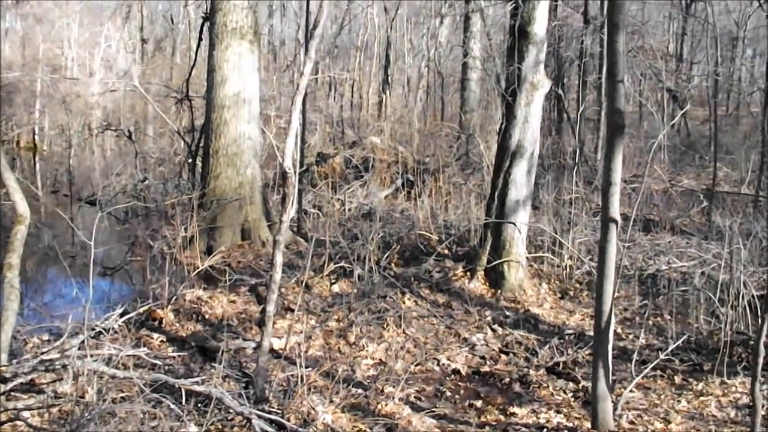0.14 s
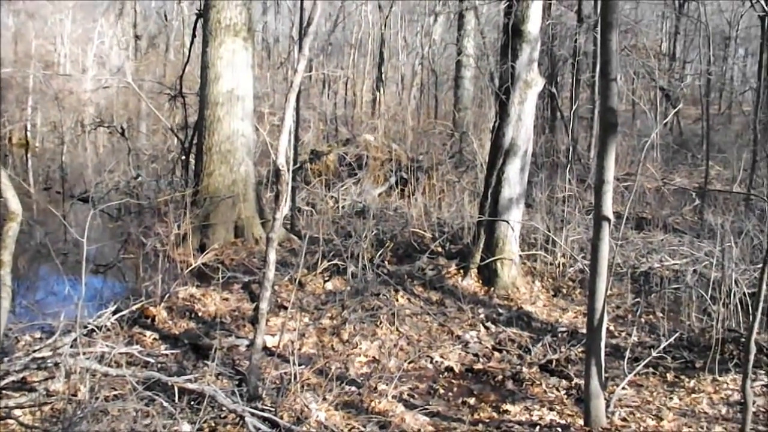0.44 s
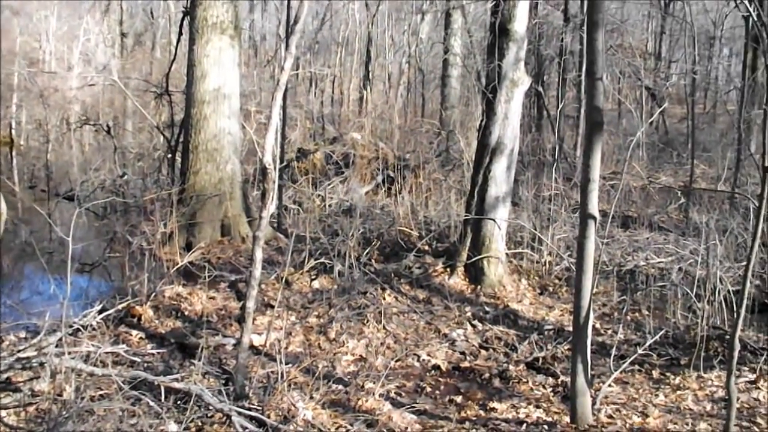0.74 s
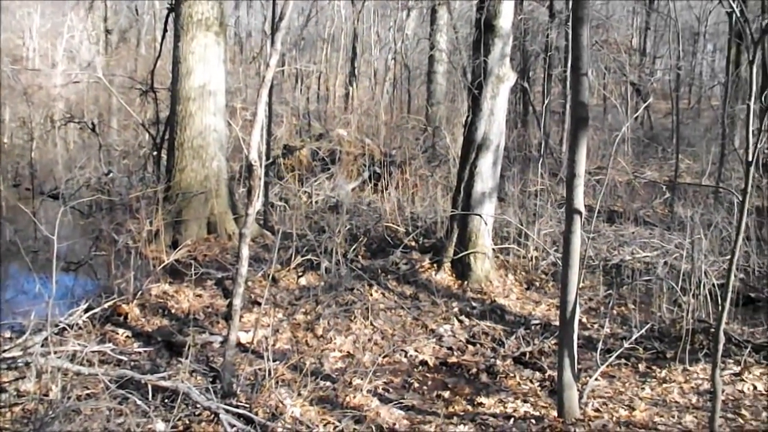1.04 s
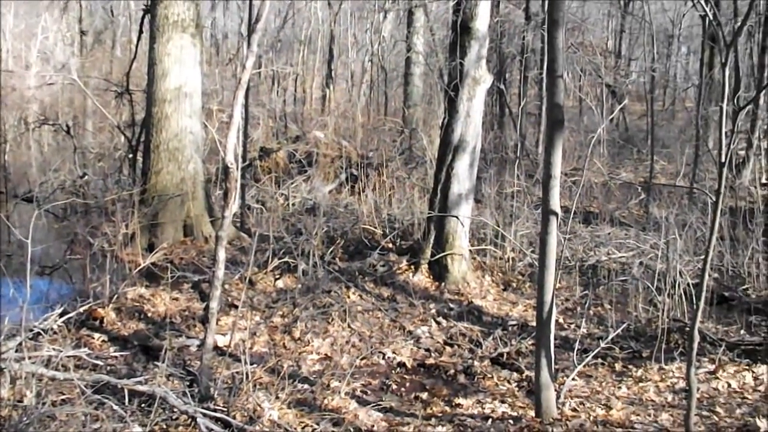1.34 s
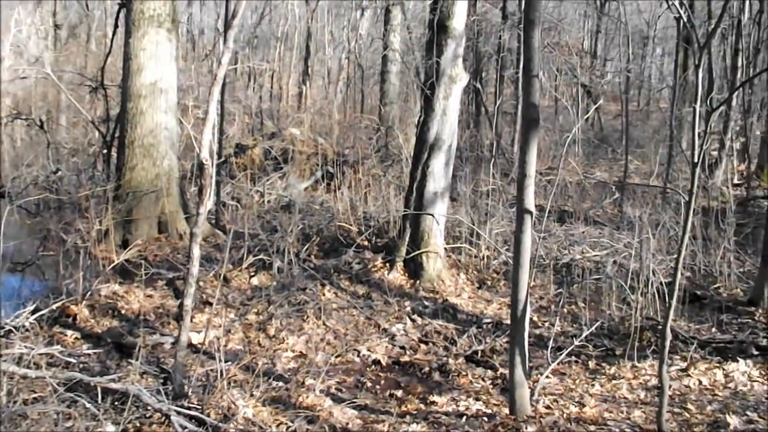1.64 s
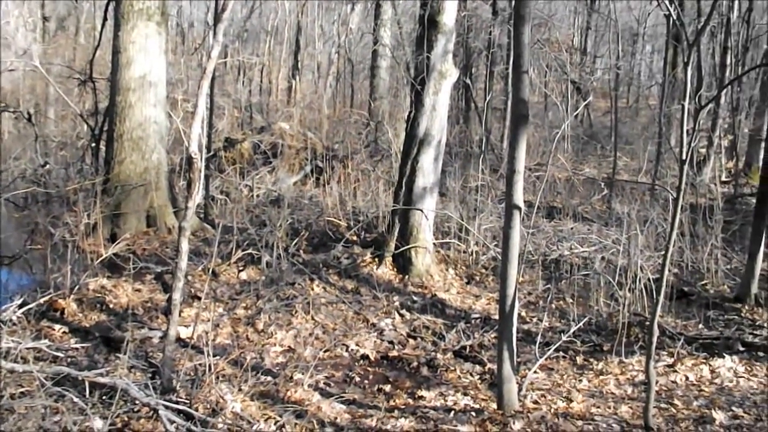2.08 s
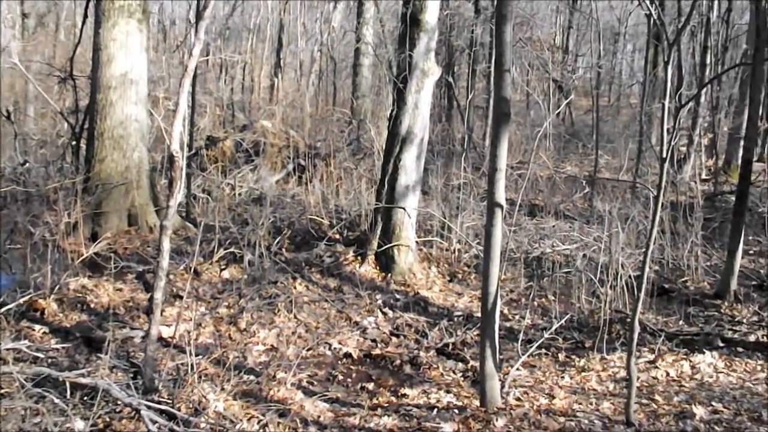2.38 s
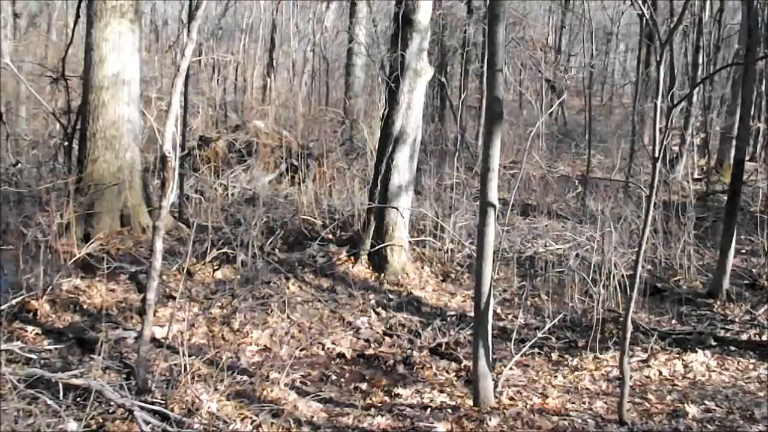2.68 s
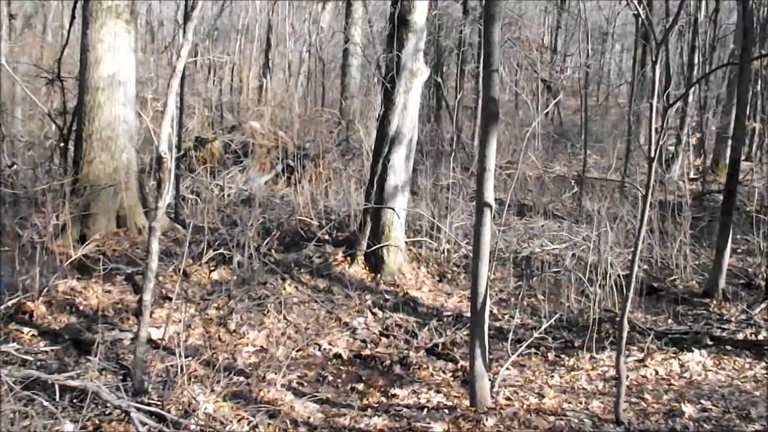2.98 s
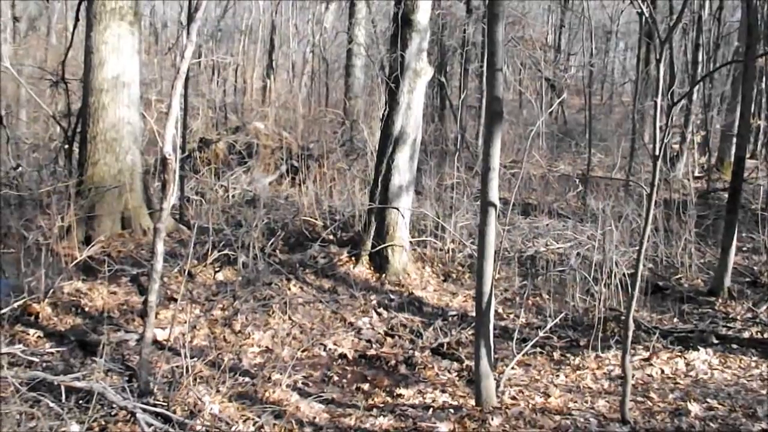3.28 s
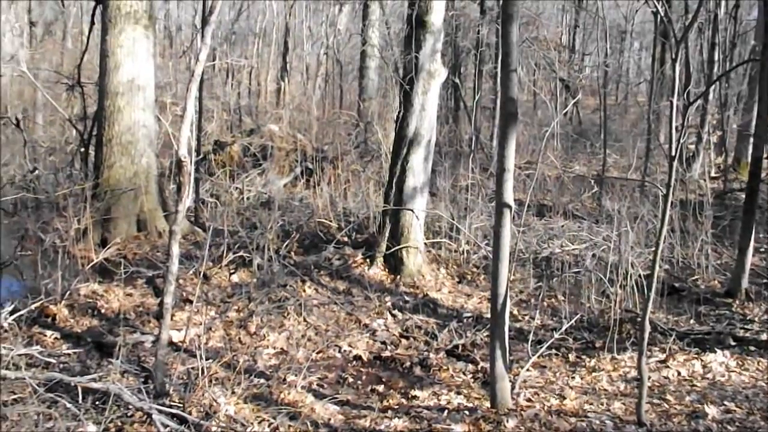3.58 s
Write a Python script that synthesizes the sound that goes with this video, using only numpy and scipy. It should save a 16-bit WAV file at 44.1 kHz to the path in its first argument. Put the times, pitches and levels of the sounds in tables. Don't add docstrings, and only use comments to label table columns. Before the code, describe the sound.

Small tree frogs peep in a dense, shrill chorus around a woodland pool, with occasional clucks and clicks.

```python
import sys
import numpy as np
from scipy import signal
from scipy.fft import rfft, irfft
from scipy.io import wavfile
from scipy.ndimage import uniform_filter1d

SR = 44100
rng = np.random.default_rng(int(sys.argv[2]) if len(sys.argv) > 2 else 0)


def generate_wav(signal):
    frames = np.transpose(np.atleast_2d(signal))
    scaled = np.clip(frames, -1, 1) * 32767
    pcm = np.round(scaled).astype(np.int16)
    wavfile.write(sys.argv[1], SR, pcm)


def linear_from_db(decibels):
    return 10 ** (np.asarray(decibels, float) / 20)


N = 164052


def evened(x):
    return x / np.sqrt(np.mean(x ** 2) + 1e-20)


def read(points, hz):
    f, value = np.transpose(points)
    return np.interp(np.log(hz + 1), np.log(f + 1), value)


def add(mix, s, sound):
    at = round(s * SR)
    part = mix[max(at, 0):][:max(len(sound) + min(at, 0), 0)]
    part += sound[max(-at, 0):][:len(part)]


def ring(x, hz, width_hz):
    r = np.exp(-np.pi * width_hz / SR)
    pole = r * np.exp(2j * np.pi * hz / SR)
    return 2 * signal.lfilter([1 - r], [1, -pole], x + 0j).real


def air():
    # frequency in Hz, level in dB per Hz
    air_colour = [(25, 4), (130, -9), (155, -17.5), (800, -31), (2600, -29), (5000, -43.5), (9000, -50.5),
                  (15000, -52.5)]
    # time in seconds, level in dB
    gusts = [
        (0, -44.5),
        (0.42, -34.5),
        (0.56, -41),
        (1.4, -42),
        (2.03, -41),
        (2.075, -29),
        (2.14, -39),
        (3.0, -44),
        (3.72, -44.5),
    ]
    patch_db, flicker_db = 0.78, 1.4
    frames = N // 256 + 5
    a, b, patches = rng.standard_normal((frames, 513, 3)).T
    patches = uniform_filter1d(patches, size=12, axis=0)
    patches = evened(uniform_filter1d(patches, size=10, axis=1))
    flicker = rng.standard_normal(frames)
    grid = (a + 1j * b) * linear_from_db(patch_db * patches + flicker_db * flicker)
    hiss = signal.istft(grid, nperseg=1024, noverlap=768)[1][:N]

    hz = np.fft.rfftfreq(N, 1 / SR)
    shaped = rfft(evened(hiss)) * linear_from_db(read(air_colour, hz)) * (hz > 12)
    low = 1 / (1 + (hz / 55) ** 8)
    gust_db = np.interp(np.arange(N) / SR, *np.transpose(gusts))
    rumble = irfft(shaped * low, N) * linear_from_db(gust_db - gust_db.mean())
    return linear_from_db(-33) * evened(rumble + irfft(shaped * (1 - low), N))


def rustle():
    # start in seconds, length in seconds, centre in Hz, width in Hz, level in dB
    rustles = [
        (2.9, .06, 7400, 1900, -62),
        (2.26, 0.13, 2600, 500, -46.5),
        (2.7, 0.29, 2650, 400, -50.5),
        (3.17, 0.08, 2300, 640, -48),
        (1.7, .4, 370, 560, -54.5),
        (3.3, 0.078, 1500, 900, -52.5),
        (.8, .08, 800, 500, -56),
    ]
    out = np.zeros(N)
    for s, length, hz, width_hz, db in rustles:
        size = round(length * SR)
        grains = rng.standard_normal(SR) * (rng.random(SR) < .03)
        grains = grains[:size] * np.hanning(size)
        add(out, s, linear_from_db(db) * evened(ring(ring(grains, hz, width_hz), hz, width_hz)))
    return out


def knocks():
    # start in seconds, peak in dB
    knock_times = [(0.056, -32), (0.163, -33.5), (0.252, -32), (0.365, -33), (2.051, -34.5), (2.329, -38),
                   (2.83, -32.5), (2.943, -31.5), (3.032, -31.5), (3.149, -33.5), (3.583, -34),
                   (3.678, -30.5)]
    # frequency in Hz, level in dB
    knock_colour = [(100, 0), (250, -1), (600, -8), (1300, -9), (2200, -11), (5000, -57)]
    peak_s = .006
    out, t = np.zeros(N), np.arange(2048) / SR
    colour = linear_from_db(read(knock_colour, np.fft.rfftfreq(2048, 1 / SR)))
    swell = t / peak_s * np.exp(1 - t / peak_s)
    for s, db in knock_times:
        puff = evened(irfft(rfft(rng.standard_normal(2048)) * colour))
        add(out, s, linear_from_db(db - 2.5) * puff * swell)
    return out


def twigs():
    # start in seconds, peak in dB, ring in Hz, ring width in Hz
    ticks = [(1.088, -42, 4860, 1215), (1.914, -46, 6200, 876), (2.076, -39.5, 5450, 2500),
             (2.3238, -23.5, 2510, 500), (2.326, -49.5, 7500, 3000), (2.4519, -42.5, 6800, 1210),
             (2.4516, -36.5, 4600, 910), (3.304, -47, 7600, 2960), (3.327, -45, 7500, 2540),
             (3.328, -43.5, 5300, 900), (1.982, -42.5, 3930, 394), (2.111, -38.5, 3990, 394)]
    out, t = np.zeros(N), np.arange(2048) / SR
    for s, db, hz, width_hz in ticks:
        burst = rng.standard_normal(2048) * np.exp(-t / 0.0021)
        tick = ring(ring(burst, hz, width_hz), hz, width_hz)
        add(out, s, linear_from_db(db) * tick / abs(tick).max())
    return out


def pops():
    # start in seconds, peak in dB, top in Hz
    snaps = [
        (.592, -20.5, 4600),
        (1.798, -23, 1900),
        (3.189, -22, 2700),
        (3.2152, -21, 2200),
        (2.3262, -31, 2600),
        (3.386, -30, 1900),
    ]
    out = np.zeros(N)
    for s, db, top_hz in snaps:
        band = signal.butter(N=3, Wn=[400, top_hz], btype='band', fs=SR, output='sos')
        snap = signal.sosfilt(band, np.arange(400) == 0)
        add(out, s, linear_from_db(db) * snap / abs(snap).max())
    return out


def cluckers():
    # start in seconds, peak in dB, throat resonance in Hz, span of the pulses in seconds
    clucks = [(0.1925, -25.5, 1650, 0.015), (0.4462, -31.5, 1450, 0.0072), (0.823, -32, 1540, 0.027),
              (1.4508, -47, 1573, 0.012), (1.631, -28.5, 1580, 0.014), (1.7945, -20.5, 1540, 0.0099),
              (1.9134, -34.5, 1550, 0.021), (2.0255, -30, 1630, 0.021), (2.4745, -36.5, 1504, 0.01),
              (2.788, -33, 1456, 0.0099), (3.193, -26.5, 1426, 0.013), (3.22, -31.5, 1445, 0.012),
              (3.3862, -32.5, 1660, 0.012), (3.5579, -29.5, 1550, 0.018), (2.338, -37, 1470, .008)]
    pulses_per_s, throat_width_hz, low_db = 150, 120, -12
    out, t = np.zeros(N), np.arange(2600) / SR
    soften = signal.butter(N=4, Wn=2620, fs=SR, output='sos')
    for s, db, hz, span in clucks:
        pulses = np.diff(np.floor(t * pulses_per_s + .8), prepend=0)
        folds = pulses + .16 * rng.standard_normal(len(t))
        drive = signal.sosfilt(soften, folds * np.exp(-t / span))
        voice = ring(drive, hz, throat_width_hz) + linear_from_db(low_db) * ring(drive, hz * 0.76, 360)
        add(out, s, linear_from_db(db + 1.5) * voice / abs(voice).max())

    murmur_hz, murmur_width_hz, murmur_per_s = 1650, 130, 1300
    far = (rng.random(N) < murmur_per_s / SR) * rng.standard_normal(N)
    murmur = ring(ring(far, murmur_hz, murmur_width_hz * 2), murmur_hz, murmur_width_hz)
    return out + linear_from_db(-49.5) * evened(murmur)


def halo():
    flicker = evened(uniform_filter1d(rng.standard_normal(N), size=200))
    grains = rng.standard_normal(N) * linear_from_db(1.5 * flicker)
    band = signal.butter(N=4, Wn=[2500, 4260], btype='band', fs=SR, output='sos')
    return linear_from_db(-41) * evened(signal.sosfilt(band, ring(grains, 3470, 840)))


def peep(length, first_hz, rise_hz, db, drift):
    bend, wobble_hz, tire_db, flutter_db = 1.3975, 7.96, -5, 3.6
    rise_s, fall_s = .012, .018
    t = np.arange(0, length, 1 / SR)
    wander = np.array([np.interp(t / length, np.linspace(0, 1, len(d)), d) for d in drift])
    slide = rise_hz * (1 - (1 - t / length) ** bend)
    turns = np.cumsum(first_hz + slide + wobble_hz * wander[0]) / SR
    edge = np.clip(np.minimum(t / rise_s, (length - t) / fall_s), 0, 1)
    shape = np.sin(np.pi / 2 * edge)
    level = linear_from_db(db + tire_db * t / length + flutter_db * wander[1])
    return np.sqrt(2) * level * shape * np.sin(2 * np.pi * turns)


def far_chorus():
    per_s, low_hz, span_hz, rise_hz = 170, 2783, 389.7, 230
    out = np.zeros(N)
    for k in range(round(per_s * 4)):
        when, pitch, long, rise, loud = rng.random(5)
        start = (k + when) / per_s - .2
        length = 0.094 + 0.0607 * long
        first_hz = low_hz + span_hz * (pitch + loud) / 2 * 1.2
        drift = rng.standard_normal((2, 12))
        add(out, start, peep(length, first_hz, rise_hz * (.6 + .8 * rise), -6 * loud, drift))
    return linear_from_db(-21) * evened(out)


def callers():
    # start in seconds, length in
    # seconds, first pitch in Hz, rise in Hz, level in dB
    pool_calls = [(0.167, .11, 2960, 248.7, -11.5), (.335, .105, 3094, 407, -14),
                  (.545, .09, 3126, 215, -11.5), (.657, .115, 3066, 343, -13), (0.776, .095, 3129, 263, -9),
                  (0.911, .108, 3070, 451, -15), (1.402, 0.1, 3123, 240.5, -20.5),
                  (1.496, .105, 3118, 258, -17), (1.57, .125, 3099, 295.6, -11.5),
                  (1.714, .118, 3019, 497, -13.5), (1.838, .095, 3133, 258, -16),
                  (2.135, .1, 3150, 240, -21), (2.231, .1, 3078, 289.6, -15.5),
                  (2.458, .115, 3064, 469.5, -12), (2.579, .085, 3193, 238.6, -16.5),
                  (2.767, .065, 3150, 222, -19.5), (2.864, .085, 3070, 298.5, -11),
                  (2.934, .07, 3346, 200, -19), (3.259, 0.066, 2967, 296, -14.5),
                  (3.28, .115, 3168, 250, -14.5), (3.532, .112, 3068, 329.5, -15),
                  (2.499, .075, 3186, 200, -18.5), (3.311, .07, 3140, 180, -17.5),
                  (.03, 0.073, 3100, 110, -17.5), (0.088, .05, 3270, 60, -14.5),
                 (.42, .06, 3050, 200, -14.5), (.475, 0.07, 2980, 170, -16), (1.0625, .05, 2995, 70, -13.5),
                 (1.138, 0.04, 3160, 60, -22), (1.215, .04, 3020, 100, -21.5),
                 (1.26, 0.081, 3180, 100, -18.5), (1.503, .06, 3020, 110, -11.5),
                 (1.8, 0.098, 3010, 120, -23), (1.99, .06, 3150, 60, -18.5), (2.289, .05, 3090, 80, -21),
                 (2.409, 0.054, 2900, 150, -21.5), (2.523, .09, 2970, 150, -20.5),
                 (2.853, .05, 2980, 100, -11.5), (3.6, .08, 3060, 190, -18.5),
                 (3.631, 0.067, 2965, 80, -18.5), (0.769, 0.056, 2930, 120, -18),
                 (2.93, 0.036, 2980, 60, -13.5), (.06, 0.051, 2900, 170, -21), (.001, .05, 3180, 120, -21),
                 (0.063, 0.087, 3050, 180, -20), (.715, .04, 3100, 100, -18.5), (2.3, .06, 2800, 140, -23),
                 (1.74, 0.031, 3210, 120, -22), (1.2484, .07, 3146, 130, -21),
                 (2.625, 0.065, 3116, 90, -18), (2.7, .05, 2970, 60, -19.5), (.96, .09, 2983, 90, -19),
                 (2.03, .1, 2750, 170, -23), (1.658, 0.047, 3150, 120, -20), (3.562, .08, 2890, 140, -21.5)]
    deep_calls = [(0.19, 0.13, 2815, 259, -16.5), (0.577, .11, 2790, 230, -17.5),
                  (0.903, 0.074, 2827, 130, -16.5), (1.372, 0.13, 2794, 250, -18.5),
                  (1.518, .11, 2828, 230, -19), (1.944, .125, 2777, 270, -18),
                  (2.185, 0.063, 2826, 130, -18), (2.703, .11, 2806, 235, -20.5),
                  (2.857, 0.042, 2825, 90, -18), (3.369, 0.13, 2792, 240, -22.5),
                  (3.517, 0.058, 2848, 80, -18.5)]
    out = np.zeros(N)
    for s, *call in pool_calls + deep_calls:
        add(out, s, peep(*call, rng.standard_normal((2, 12))))
    return out


def woods(x, wet_db):
    t60_s = 0.57
    t = np.arange(SR // 2) / SR
    tail = rng.standard_normal(len(t)) * linear_from_db(-60 * t / t60_s) * np.minimum(t / 0.0066, 1)
    wet = signal.fftconvolve(x, tail / np.linalg.norm(tail))[:N]
    return (x + linear_from_db(wet_db) * wet) / np.sqrt(1 + linear_from_db(2 * wet_db))


def scene():
    ground = air() + rustle() + knocks() + twigs() + pops()
    chorus = halo() + woods(far_chorus(), -3.5) + woods(callers(), -4)
    return (ground + cluckers() + chorus)[None]


def top_cut(x):
    return signal.sosfilt(signal.butter(12, 15830, fs=SR, output="sos"), x)


def record(dry):
    # time in seconds, click level in dB (steps louder than -33 dB also duck the scene)
    steps = [(0.0014, -50), (0.2018, -28), (0.2338, -40), (0.605, -28), (0.637, -41), (0.6852, -28),
             (0.7172, -39), (0.7491, -36), (0.9681, -24), (1.032, -39), (1.6201, -23), (1.652, -31),
             (2.4961, -22), (2.5281, -40), (2.5604, -44), (2.8798, -26.5), (2.9436, -32.5), (3.7165, -27)]
    lag_s, swell_s, whistle_hz = .0014, 0.011, 3150
    duck_first_db, recover_db_per_s, loud_step_db = 1.5, 2.5, -33
    extra, duck_db, t = np.zeros(N), np.zeros(N), np.arange(N) / SR
    before = np.arange(-600, 0) / SR
    fade_in = np.hanning(2 * len(before))[:len(before)]
    overshoot = np.exp(before / swell_s) * fade_in * np.cos(2 * np.pi * whistle_hz * before + 1.25)
    for s, db in steps:
        if db > loud_step_db:
            recovery = duck_first_db - recover_db_per_s * (t - s)
            duck_db = np.maximum(duck_db, recovery * (t > s + lag_s))
        add(extra, s + lag_s + before[0], linear_from_db(db + 12) * overshoot)
    for s in np.arange(.0125, N / SR, .0339):
        add(extra, s, linear_from_db(-45.5 + 2 * rng.standard_normal()) * np.array([1., -.3]))
    extra += np.sqrt(2) * linear_from_db(-79.5) * np.sin(2 * np.pi * 15725 * t)
    mixed = dry * linear_from_db(-uniform_filter1d(duck_db, size=40)) + extra
    squeezed = mixed - .012 * mixed ** 3
    return top_cut(squeezed)


dry = scene()
out = record(dry)
generate_wav(out)
```